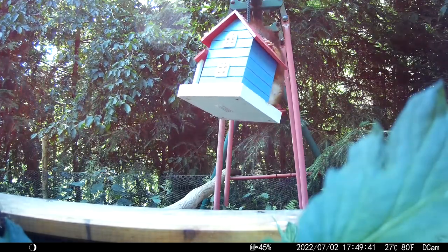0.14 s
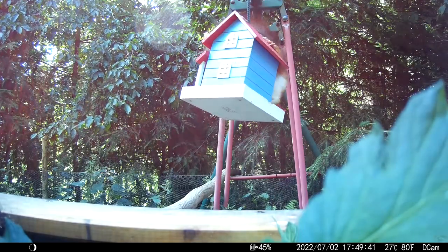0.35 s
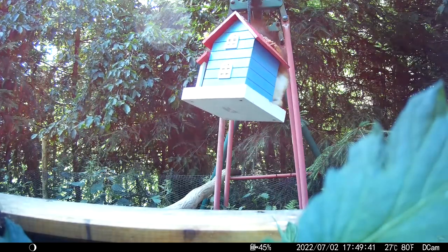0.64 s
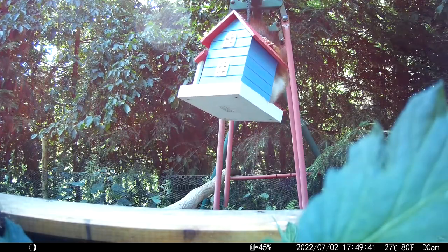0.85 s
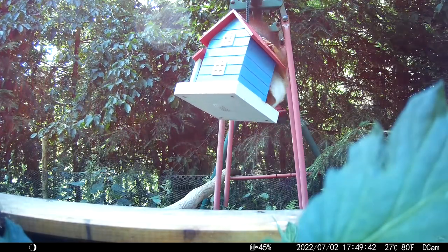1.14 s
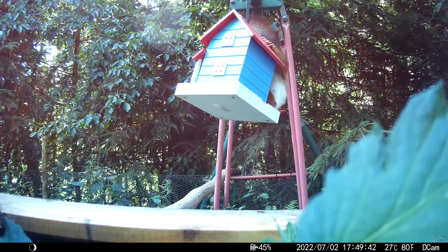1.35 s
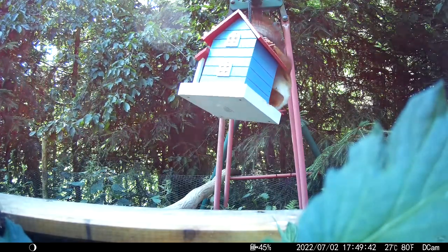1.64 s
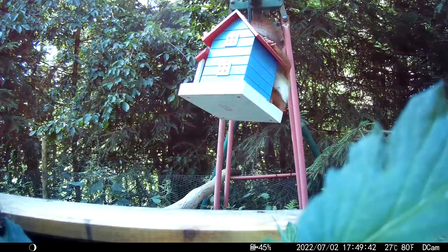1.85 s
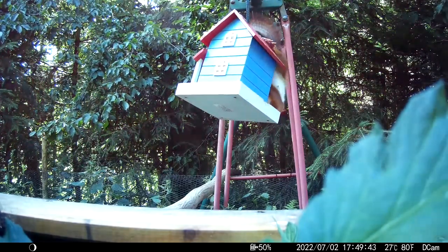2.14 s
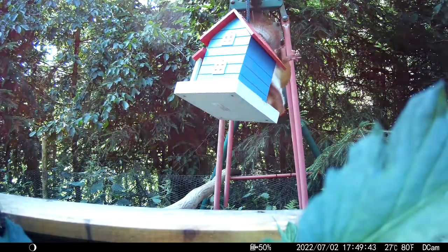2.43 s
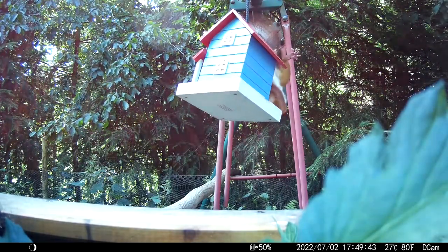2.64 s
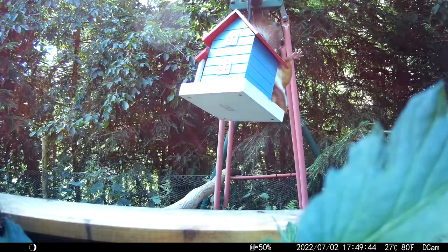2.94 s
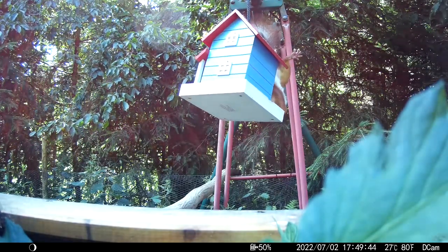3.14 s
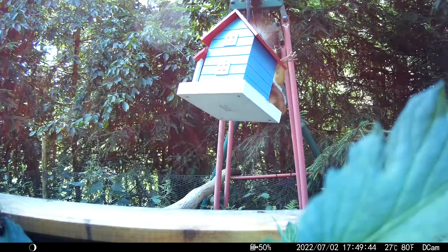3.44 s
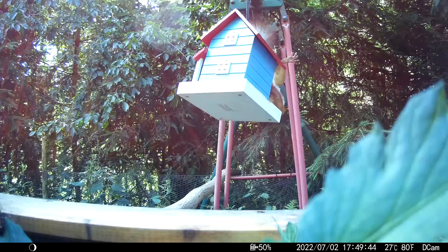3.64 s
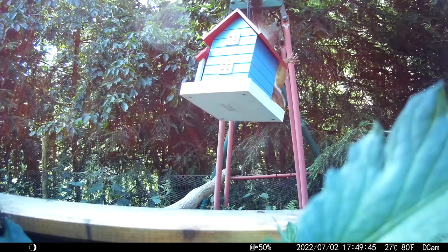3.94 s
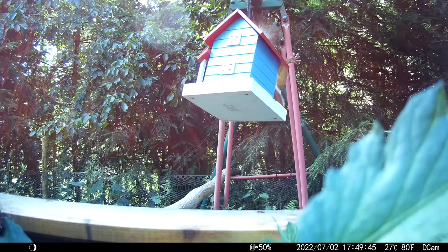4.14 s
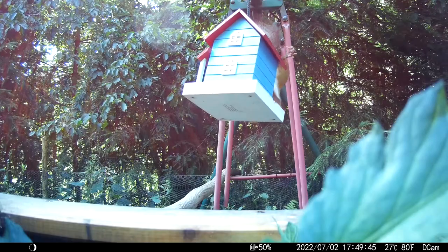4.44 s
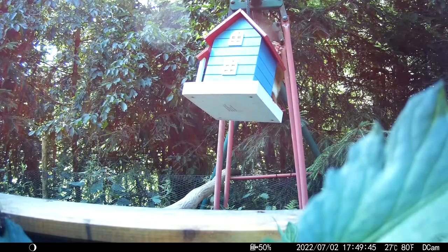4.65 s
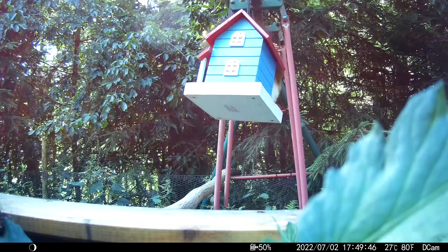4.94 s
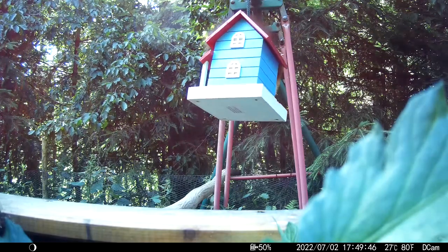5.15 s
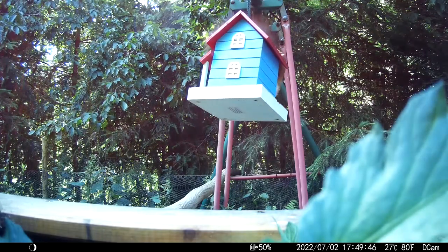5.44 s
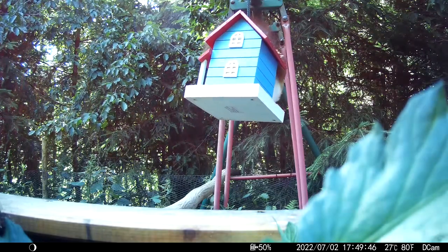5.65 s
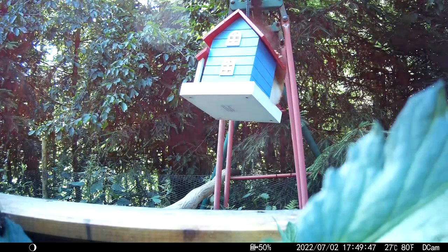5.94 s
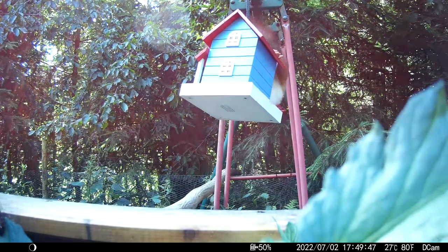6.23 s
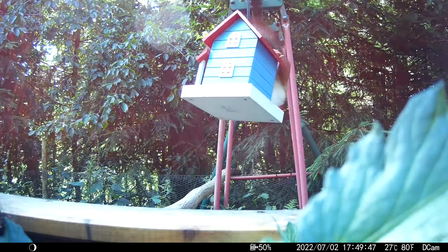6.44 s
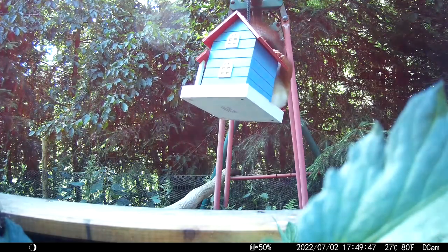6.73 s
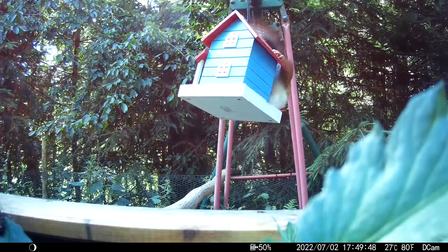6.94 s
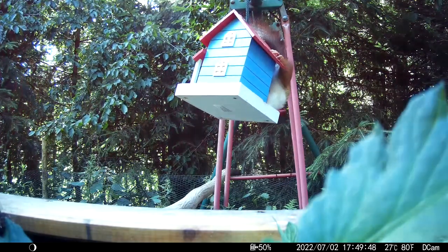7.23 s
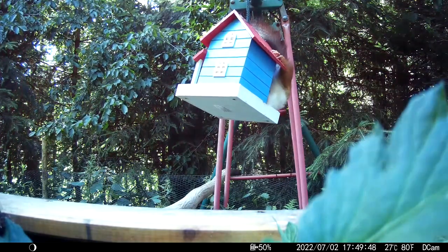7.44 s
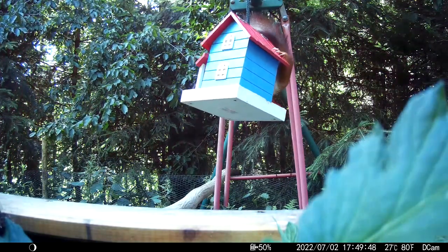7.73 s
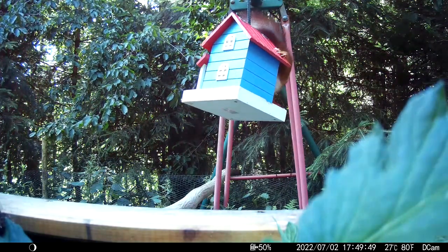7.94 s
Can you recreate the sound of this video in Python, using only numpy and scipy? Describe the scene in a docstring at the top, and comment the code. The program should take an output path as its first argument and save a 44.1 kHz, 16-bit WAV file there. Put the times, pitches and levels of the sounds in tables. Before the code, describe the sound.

Dry claw scrabbling on thin boards, sparse in the middle and hardest near the end, over blackbird whistles, faint hiss and a distant low drone.

```python
"""Garden, 8 s, at a trail camera's microphone close to a small wooden bird feeder with a squirrel on it.
0-2.5 s: claw clicks and gritty strokes, stick-slip noise through board resonances; a blackbird whistles.
2.5-4.8 s: sparser; sharp gliding chirps of a tit, then a soft even run of rubs.
From 4.8 s: scrabbling returns, hardest from 5.5 s, with squeaks, thuds and more gliding whistles.
Throughout: a far engine drones as two wavering sines under the camera's noise hiss and thin sine whine."""
import sys
import numpy as np
from scipy import signal
from scipy.fft import rfft, irfft
from scipy.io import wavfile

SR = 44100
rng = np.random.default_rng(int(sys.argv[2]) if len(sys.argv) > 2 else 0)


def generate_wav(signal):
    """Clip the signal to [-1, 1] and save it as 16-bit WAV at the path in sys.argv[1]."""
    frames = np.transpose(np.atleast_2d(signal))
    scaled = np.clip(frames, -1, 1) * 32767
    pcm = np.round(scaled).astype(np.int16)
    wavfile.write(sys.argv[1], SR, pcm)


N = 356063
TIME = np.arange(N) / SR

# Garden air and camera hiss, spectral shape: (f/Hz, relative level/dB per Hz)
AIR_SPECTRUM = [(12, -37), (20, -7.5), (42, -6), (54, -2), (72, -8.5), (100, -6), (130, -7.5), (200, -8),
                (290, -10.5), (580, -18), (1200, -22.5), (4000, -23.5), (9000, -25), (15600, -34.5)]
AIR_RMS_DB = -59
# Swell of the distant rumble: (t/s, level/dB)
RUMBLE_SWELL = [(0, -1.5), (.6, .5), (1.8, 1.5), (3, -.5), (5, -1.5), (5.7, 1), (6.4, 0), (7.1, 2),
                (8.07, 1.5)]
# Camera whine: (f/Hz, rms level/dB)
WHINE_LINES = [(4687, -77.5), (6250, -77), (9375, -78), (10938, -82.5), (12500, -89), (14062, -88)]
# Far engine, before its trim: (t/s, f/Hz, fundamental level/dB, octave level/dB)
ENGINE_COURSE = [(0, 104, -74, -78), (.45, 97, -61, -70), (1.2, 91, -74, -75), (2.0, 91, -58.5, -64.5),
                 (2.7, 90, -67, -78), (3.6, 91, -61, -68), (4.45, 99, -64.5, -60.5), (4.9, 102, -68, -78),
                 (6.2, 106, -62, -67), (6.7, 108, -64, -71), (7.05, 109, -59, -66), (7.6, 101, -65, -82),
                 (8.07, 100, -69, -64)]
# Bird levels are rms, before the trims in birds() and the waver in loudness.
# Blackbird whistles, one list of points each: (t/s, f/Hz, level/dB)
BLACKBIRD_WHISTLES = [
    [(.27, 2010, -72), (.31, 1970, -71.5), (.37, 1940, -76)],
    [(.41, 2220, -70), (.45, 2270, -65.5), (.47, 2280, -69)],
    [(.72, 1676, -71), (.77, 1703, -71), (.84, 1696, -69)],
    [(1.02, 2660, -69), (1.06, 2570, -64)],
    [(1.27, 2090, -65), (1.32, 2140, -68), (1.38, 2130, -69)],
    [(1.885, 2660, -63), (1.94, 2700, -61), (1.99, 2736, -60)],
    [(6.43, 2220, -73), (6.54, 2230, -66), (6.65, 2180, -69)],
    [(6.67, 2380, -67), (6.72, 2260, -63), (6.76, 2270, -66), (6.83, 2100, -50), (6.88, 2040, -56),
     (6.905, 1890, -63)],
    [(7.13, 1540, -59), (7.18, 1840, -58), (7.24, 2075, -57.5), (7.29, 2098, -55), (7.35, 2090, -61)],
    [(7.395, 1970, -71), (7.435, 1855, -58), (7.48, 1850, -60.5), (7.53, 1882, -59), (7.58, 1850, -56.5),
     (7.615, 1830, -62)],
]
# Fast blackbird trills: (t/s, length/s, first f/Hz, last f/Hz, level/dB)
BLACKBIRD_TRILLS = [(.46, .13, 2280, 2080, -70), (1.07, .08, 2500, 2280, -70), (2.15, .28, 2150, 2260, -72),
                    (6.18, .08, 2450, 2200, -67), (6.26, .11, 1950, 2000, -66)]
# Thin calls of small birds: (t/s, length/s, top f/Hz, level/dB)
SMALL_BIRD_CALLS = [(.76, .34, 6930, -63), (6.19, .14, 7950, -65), (6.40, .14, 7850, -67)]
# Sharp chirps of a tit: (t/s, length/s, top f/Hz, level/dB)
TIT_CHIRPS = [(3.478, .052, 6850, -43.5), (3.738, .05, 6530, -56)]
# Short notes of a far songbird: (t/s, length/s, top f/Hz, level/dB)
FAR_TWITTER = [(.29, .1, 4050, -66), (3.585, .04, 3620, -64), (4.11, .045, 3200, -63),
               (6.645, .09, 3450, -63)]
# Low modes of the hollow feeder box: (f/Hz, relative level/dB, t60/s)
BOX_MODES = [(288, -6, .03), (389, 0, 0.06), (523, -4.5, .02), (670, -1, .018), (910, -2.5, 0.011)]
# Modes of the feeder's thin walls: (f/Hz, relative level/dB, t60/s)
WALL_MODES = [(1103, -6, 0.012), (1350, -3, 0.017), (1596, -3.5, 0.028), (1810, -6, 0.022),
              (1980, -1, 0.027), (2310, -1, 0.022)]
# Ringing of the thin boards, before ring_db and chance: (f/Hz, width/Hz, level over direct sound/dB)
BOARD_RINGING = [(1543, 130, 7.5), (2070, 50, -4), (2700, 20, -11), (3297, 63, -1), (3492, 29, 5.5),
                 (3740, 40, 6), (4566, 180, -4.5), (4900, 78, -5.5), (5680, 51, -5.5), (6300, 130, -7.5),
                 (7020, 140, -2.5)]
# Spectral shape of claw on wood: (f/Hz, relative level/dB per Hz)
CLAW_SPECTRUM = [(400, -31), (1000, -29), (1600, -23), (2300, -14), (3100, -4.5), (4000, -1.5), (4800, 3),
                 (5400, 3), (6500, 1.5), (7700, -0.5), (8400, -11), (9300, -22.5), (12000, -35),
                 (15500, -47)]
# The feeder is bumped: (t/s, time scale/s, thud level/dB, knock level/dB)
FEEDER_BUMPS = [(1.074, .0058, -72, -57), (1.352, .0032, -70, -55), (1.876, .0036, -60, -52.5),
                (2.011, .0031, -59, -51.5), (2.06, .03, -67, -60), (2.456, .005, -59, -58.5),
                (5.114, .006, -53.5, -64), (5.635, .035, -58, -59), (6.064, .0056, -56, -48.5),
                (6.797, .02, -61, -49), (7.084, .035, -61, -61), (7.889, .023, -60, -61)]
# A claw catches and one spot of the wood sings: (t/s, time scale/s, f/Hz, peak level before flutter/dB)
CLAW_SQUEAKS = [(0.156, 0.012, 7270, -43.5), (0.157, 0.014, 4570, -48), (0.16, 0.017, 3560, -46),
                (0.1545, 0.015, 2590, -48), (0.963, 0.011, 2600, -51), (1.433, 0.0099, 3300, -50),
                (5.105, 0.014, 5500, -44.5), (5.099, 0.022, 4050, -54), (5.615, .018, 4670, -29),
                (6.772, 0.0065, 6080, -22.5), (6.789, .020, 3360, -27.5), (6.791, 0.013, 3460, -34),
                (6.788, 0.02, 2770, -32.5), (7.072, .05, 2610, -48.5)]
# Clear claw clicks, before their trim: (t/s, skitter time scale/s, rms level over 4 ms/dB)
CLAW_CLICKS = [(.085, .0011, -55), (.155, .003, -40.5), (.1905, .0005, -43), (.711, .002, -50),
               (.9657, .0032, -43.5), (1.0775, .0024, -39.5), (1.2077, .0008, -45), (1.262, .0005, -47.5),
               (1.3059, .0004, -47), (1.3224, .0005, -49), (1.3713, .0026, -41), (1.4331, .0013, -41.5),
               (1.5514, .0008, -46), (1.6212, .0015, -43), (1.751, .0005, -51), (1.7983, .0009, -44.5),
               (1.8756, .0019, -36), (2.0133, .0023, -38.5), (2.0966, .0017, -39), (2.2907, .0037, -43.5),
               (2.4324, .0024, -46), (2.4578, .0013, -43), (2.5576, .0034, -44), (3.0889, .0018, -46),
               (4.8234, .0009, -48), (5.0724, .0008, -48.5), (5.1138, .0014, -34.5), (5.369, .003, -46),
               (5.393, .0005, -50), (5.4311, .0026, -39.5), (5.6625, .0004, -36), (5.68, .0005, -41.5),
               (5.9633, .0015, -45.5), (6.0282, .0006, -35), (6.0841, .0006, -34), (6.0955, .0011, -34),
               (6.115, .0005, -42.5), (6.1474, .0004, -45), (6.6134, .001, -39.5), (6.8299, .0005, -37),
               (6.8394, .0004, -38), (6.9142, .0012, -38), (6.9406, .0005, -38), (7.0075, .0004, -30.5),
               (7.1197, .001, -34.5), (7.1536, .0007, -36.5), (7.1931, .0007, -43), (7.232, .0003, -43),
               (7.5458, .002, -47), (7.5747, .0013, -33), (7.6974, .001, -37.5), (7.7508, .0007, -33.5),
               (7.7987, .0004, -37.5), (7.8386, .0006, -39.5), (7.8555, .001, -42.5)]
# Single claw strokes, from hard rasps to faint rubs:
# (t of the peak/s, time scale/s, rms level/dB, body colour/dB, edge colour/dB)
SINGLE_STROKES = [(.165, .013, -39, 2, 0), (.196, .024, -54, 6, 1), (1.179, .036, -50, 5, -1),
                  (1.434, .02, -48.5, 1, -6), (1.621, .04, -46.5, 1, 1), (1.835, .034, -49, 5, -1),
                  (1.88, .025, -48, 3, 3), (2.06, .05, -50, 4, 1.5), (2.715, .04, -55, 8, 1.5),
                  (3.45, .04, -62, 7, -3), (3.745, .035, -61, 7, -3), (4.895, .043, -54.5, -4, 1),
                  (5.503, .025, -50, 0, 5), (5.568, .03, -39, 2, -1), (5.589, .003, -25, -2, -3),
                  (5.597, .0037, -19.5, 1, -7), (5.603, .0064, -26, 0, -4), (5.624, .02, -26.5, 1.5, 1),
                  (5.648, .031, -40.5, 11, 8), (6.026, .016, -41.5, 5.5, -6), (6.046, .008, -28.5, 6, 3),
                  (6.062, .026, -29.5, 4, 3.5), (6.088, .031, -49, 10, 3), (6.528, .017, -40.5, 1.5, -7),
                  (6.573, .039, -46, 3, -3), (6.614, .031, -43, 2.5, 1), (6.767, .022, -44, 0, -2),
                  (6.777, .008, -26, -12, -2), (6.8, .026, -24.5, 6.5, -5.5), (6.83, .04, -48, -3, 3),
                  (6.93, .024, -46, 10, -3), (6.963, .016, -26.5, 0, -5), (6.988, .042, -36, 2, -2),
                  (7.052, .017, -38, -1, 4), (7.085, .049, -32, 2.5, 4), (7.12, .02, -41.5, 9.5, -10),
                  (7.294, .027, -52, 1, -2), (7.7, .03, -52, 3, -3), (7.889, .026, -36, 2.5, .5),
                  (7.941, .022, -39, 0, -1), (8.002, .02, -45, 1, 0)]
# Bouts of light scrabbling for a grip: (start t/s, end t/s, rms level of a stroke/dB)
SCRABBLE_BOUTS = [(.36, .43, -60), (.55, .6, -60), (1.2, 1.33, -58.5), (1.45, 1.58, -56), (1.64, 1.7, -53),
                  (1.91, 1.96, -54), (2.0, 2.13, -54), (2.15, 2.47, -57.5), (4.77, 4.85, -58),
                  (5.09, 5.14, -56), (5.26, 5.33, -61), (5.68, 5.97, -59), (6.65, 6.76, -60),
                  (7.13, 7.21, -54), (7.53, 7.65, -56), (7.68, 7.86, -55), (7.9, 8.04, -53)]

# Light strokes within a bout
PAWS_PER_S, PAW_S, PAW_SPREAD_DB = 24, .026, 1.5
PAW_BODY_DB, PAW_EDGE_DB = 3.5, 0.0
# Stray ticks, above the level of their bout
TICKS_PER_S, TICK_S, TICK_OVER_DB, TICK_SPREAD_DB = 20, .0006, 5.5, 1.5
# Colour of a 1 ms click; a longer skitter stirs more of the wood
CLICK_BODY_DB, BODY_DB_PER_OCTAVE, CLICK_EDGE_DB = .7, 1.7, 0.0
CLICK_COLOUR_SPREAD_DB = 1.5
RISE_SHARE = .45   # part of a stroke's time scale in which the claw bites in
PRESSURE_SHAPE = 1.9   # 2 is a round swell, 1 a pointed one
# A quick, even run of soft rubs that swells and fades
RUBS_MIDDLE_S, RUBS_PER_S, RUB_S = 4.055, 13.0, .025
RUB_DB, RUB_FADE_DB = -60, 2.5   # the middle rub; loss per rub away from it
RUB_BODY_DB, RUB_EDGE_DB = 6.0, -3.0
CUTOFF_HZ = 15750


def from_db(db):
    """Amplitude ratio of a level in dB."""
    return 10 ** (np.asarray(db) / 20)


def rms_one(x):
    """Scale a signal to an rms of 1."""
    return x / np.sqrt(np.mean(x ** 2) + 1e-20)


def at_hz(points, hz):
    """Read a spectrum along a logarithmic frequency axis."""
    points = np.array(points, float)
    return np.interp(np.log(np.maximum(hz, 1)), np.log(points[:, 0]), points[:, 1])


def add(out, sound, start_s):
    """Mix a sound in at its time."""
    at = max(round(start_s * SR), 0)
    out[at:at + len(sound)] += sound[:max(N - at, 0)]


def drift(rate, size):
    """Smooth chance with a spread near 1, with so many random knots per second."""
    knots = rng.standard_normal(int(size / SR * rate) + 2)
    return np.interp(np.arange(size) / SR * rate, np.arange(len(knots)), knots)


def with_energy(sound, level_db, samples):
    """Scale a sound to the energy of that rms level held for so many samples."""
    return sound * from_db(level_db) * np.sqrt(samples / (np.sum(sound ** 2) + 1e-20))


def background():
    """Distant rumble under the camera's even hiss and whine: shaped noise and steady sines."""
    hz = np.arange(N // 2 + 1) * SR / N
    shaped = irfft(rfft(rng.standard_normal(N)) * from_db(at_hz(AIR_SPECTRUM, hz)), N)
    air = from_db(AIR_RMS_DB) * rms_one(shaped)
    low = irfft(rfft(air) / (1 + (hz / 1200) ** 2), N)
    swell = from_db(np.interp(TIME, *np.transpose(RUMBLE_SWELL)))
    whine = sum(np.sqrt(2) * from_db(db) * np.sin(2 * np.pi * line_hz * TIME)
                for line_hz, db in WHINE_LINES)
    return air + low * (swell - 1) + whine


def engine(trim_db=-2.5):
    """A far drone, fundamental and octave, whose speed sags and picks up; the air makes it waver."""
    s, hz, *levels = np.transpose(ENGINE_COURSE)
    pitch = np.interp(TIME, s, hz) * (1 + 0.0083 * drift(18, N))
    phase = 2 * np.pi * np.cumsum(pitch) / SR
    out = np.zeros(N)
    for harmonic, db in enumerate(levels, start=1):
        loudness = from_db(np.interp(TIME, s, db) + trim_db + 1.86 * drift(14, N))
        out += np.sqrt(2) * loudness * np.sin(harmonic * phase)
    return out


def trees(sound, wet_db, t60):
    """Trunks and leaves scatter a soft tail back: decaying noise with a gentle onset."""
    t = np.arange(SR) / SR
    tail = rng.standard_normal(SR) * 1000 ** (-t / t60) * (1 - np.exp(-t / 0.0065))
    return sound + signal.fftconvolve(sound, with_energy(tail, wet_db, 1))[:N]


def whistles(notes, waver, flutter_db, fade_s=0.0048, trill=0.0, trill_hz=32):
    """Nearly pure gliding tones with a slight waver; a trill swings the pitch up and down."""
    out = np.zeros(N)
    for note in notes:
        s, hz, level_db = np.transpose(note)
        t = np.arange(s[0], s[-1], 1 / SR)
        swing = trill * np.sin(2 * np.pi * trill_hz * (t - t[0]))
        pitch = np.interp(t, s, hz) * (1 + waver * drift(250.6, len(t)) + swing)
        gate = np.clip(np.minimum(t - t[0], t[-1] - t) / fade_s, 0, 1)
        loudness = gate * from_db(np.interp(t, s, level_db) + flutter_db * drift(61.6, len(t)))
        add(out, np.sqrt(2) * loudness * np.sin(2 * np.pi * np.cumsum(pitch) / SR), s[0])
    return out


def arches(calls, rise, fall, ends_db, top_share):
    """Each call swings up to its top pitch and level, then sinks; rise and fall are shares of that pitch."""
    return [[(s, hz * (1 - rise), db + ends_db),
             (s + top_share * length_s, hz, db),
             (s + length_s, hz * (1 - fall), db + ends_db)] for s, length_s, hz, db in calls]


def slides(calls, fade_db):
    """Each call slides evenly between two pitches and fades on the way."""
    return [[(s, first_hz, db + fade_db / 2),
             (s + length_s, last_hz, db - fade_db / 2)] for s, length_s, first_hz, last_hz, db in calls]


def birds():
    """A blackbird and smaller birds, gliding tones at different depths in the trees."""
    trills = slides(BLACKBIRD_TRILLS, fade_db=4.0)
    calls = arches(SMALL_BIRD_CALLS, rise=.005, fall=.003, ends_db=-2.0, top_share=.5)
    chirps = arches(TIT_CHIRPS, rise=.17, fall=.015, ends_db=-12.0, top_share=.38)
    notes = arches(FAR_TWITTER, rise=.04, fall=.06, ends_db=-3.0, top_share=.3)

    whistled = trees(whistles(BLACKBIRD_WHISTLES, waver=0.0037, flutter_db=1.5), wet_db=-7.5, t60=.85)
    trilled = trees(whistles(trills, waver=.03, flutter_db=3.0, trill=0.07), wet_db=-2.0, t60=.5)
    thin = trees(whistles(calls, waver=.011, flutter_db=2.0), wet_db=-5.0, t60=0.3)
    chirped = trees(whistles(chirps, waver=0.02, flutter_db=2.5), wet_db=-7.5, t60=0.25)
    twitter = trees(whistles(notes, waver=.04, flutter_db=3.0), wet_db=1.0, t60=0.3)
    small = from_db(-4.0) * thin + from_db(-2.0) * chirped + from_db(-5.0) * twitter
    return whistled + from_db(-2.0) * trilled + small


def bumps():
    """Paws and body push on the feeder: noise bursts make the box thud and its walls knock."""
    out, t = np.zeros(N), np.arange(SR // 6) / SR
    for s, length_s, thud_db, knock_db in FEEDER_BUMPS:
        force = rng.standard_normal(len(t)) * np.exp(-(t / length_s) ** 2)
        for modes, level_db in ((BOX_MODES, thud_db), (WALL_MODES, knock_db)):
            ring = np.zeros(len(t))
            for k, (hz, db, t60) in enumerate(modes):
                sign = (-1) ** k   # neighbouring modes move in opposite directions
                ring += sign * from_db(db) * np.sin(2 * np.pi * hz * t) * 1000 ** (-t / t60)
            sound = signal.fftconvolve(force, ring)
            add(out, with_energy(sound, level_db, (length_s + 0.0026) * SR), s)
    return out


def squeaks(waver=0.015):
    """The slips lock onto one resonance for a moment, unevenly: short wavering sines."""
    out = np.zeros(N)
    for s, length_s, hz, level_db in CLAW_SQUEAKS:
        t = np.arange(0, 1.7 * length_s, 1 / SR)
        grip = np.interp(t / length_s, [0, .06, .85, 1.5], [0, 1, 1, 0]) ** 2
        phase = 2 * np.pi * hz * np.cumsum(1 + waver * drift(760, len(t))) / SR
        loudness = from_db(level_db + 3.5 * drift(590, len(t)))
        add(out, loudness * grip * np.sin(phase), s)
    return out


def causal(gain_db):
    """Minimum-phase response for a gain curve: nothing sounds before its cause."""
    cepstrum = irfft(np.log(from_db(gain_db)))
    half = len(cepstrum) // 2
    cepstrum[1:half] *= 2
    cepstrum[half + 1:] = 0
    return np.exp(rfft(cepstrum))


def through_boards(force, body_db, edge_db, ring_db, grit_db, patchy_db, patch_hz, size=4096):
    """Claw force heard through the wood; each spot it touches favours other resonances."""
    hz = np.arange(size // 2 + 1) * SR / size
    colour = [(700, .5 * edge_db), (1800, body_db), (3200, body_db), (4200, 0), (5200, 0),
              (6300, edge_db), (8500, edge_db), (10500, 2 * edge_db + grit_db)]
    patches = np.interp(hz / patch_hz, np.arange(len(hz)), rng.standard_normal(len(hz)))
    spot = at_hz(colour, hz) + patchy_db * patches
    wood = 1   # the direct sound
    for mode_hz, width_hz, mode_db in BOARD_RINGING:
        strength = from_db(mode_db + ring_db + rng.normal(0, 1.8))
        wood = wood + strength / (1 + 2j * (hz - mode_hz) / width_hz)
    response = irfft(causal(at_hz(CLAW_SPECTRUM, hz) + spot) * wood)
    return signal.fftconvolve(force, response)


def clicks(snaps, trim_db=-.5, chatter=0.2, rebound_db=-8.0):
    """A claw tip snaps off the grain, skitters for a moment and lands once more."""
    out, t = np.zeros(N), np.arange(SR // 40) / SR
    level_window_s, usual_s = .004, .001
    for s, length_s, level_db in snaps:
        force = chatter * rng.standard_normal(len(t)) * np.exp(-.3 * (t / length_s) ** 2)
        force[0] += 1
        landing = int(rng.uniform(.001, .005) * SR)
        force[landing] += from_db(rebound_db + rng.normal(0, 3))
        body_db = CLICK_BODY_DB + BODY_DB_PER_OCTAVE * np.log2(length_s / usual_s)
        body_db += CLICK_COLOUR_SPREAD_DB * rng.standard_normal()
        edge_db = CLICK_EDGE_DB + CLICK_COLOUR_SPREAD_DB * rng.standard_normal()
        sound = through_boards(force, body_db, edge_db, ring_db=-4.0, grit_db=-16.0,
                               patchy_db=2.4, patch_hz=611)
        add(out, with_energy(sound, level_db + trim_db, level_window_s * SR), s)
    return out


def slips(size, per_s, spread_db):
    """Stick and slip: tiny releases at random moments, a few much larger than the rest."""
    heights = from_db(spread_db * np.minimum(rng.exponential(1, size), 4))
    signs = rng.choice([-1, 1], size)
    return heights * signs * (rng.random(size) < per_s / SR)


def scratches(strokes, judder_db, slips_per_s, spread_db, rub):
    """A claw bites, drags and lets go; light strokes crackle, hard ones rasp."""
    out = np.zeros(N)
    for peak_s, length_s, level_db, body_db, edge_db in strokes:
        rise_s, fall_s = RISE_SHARE * length_s, (1 - RISE_SHARE) * length_s
        t = np.arange(-1.8 * rise_s, 2.1 * fall_s, 1 / SR)
        pressure = np.exp(-.5 * np.abs(t / np.where(t < 0, rise_s, fall_s)) ** PRESSURE_SHAPE)
        per_s = slips_per_s * from_db(.8 * (level_db + 42.5))   # slips_per_s holds at -42.5 dB
        ridges = from_db(judder_db * drift(258.5, len(t)))   # the claw crosses the grain of the wood
        friction = slips(len(t), per_s, spread_db) + rub * rng.standard_normal(len(t))
        force = pressure * ridges * friction
        sound = through_boards(force, body_db, edge_db, ring_db=-5.5, grit_db=4.0,
                               patchy_db=2.5, patch_hz=110)
        add(out, with_energy(sound, level_db, np.sum(pressure ** 2)), peak_s + t[0])
    return out


def rubs(count=7):
    """Evenly spaced soft strokes, strongest in the middle of the run."""
    return [(RUBS_MIDDLE_S + k / RUBS_PER_S, RUB_S, RUB_DB - RUB_FADE_DB * abs(k), RUB_BODY_DB, RUB_EDGE_DB)
            for k in np.arange(count) - count // 2]


def scrabbling():
    """Light strokes and stray ticks of paws that hunt for a grip, as two lists of events."""
    strokes, ticks = [], []
    for start_s, end_s, level_db in SCRABBLE_BOUTS:
        bout_s = end_s - start_s
        count = max(round(PAWS_PER_S * bout_s), 1)
        for k in range(count):
            late, longer, louder = rng.standard_normal(3)
            s = start_s + bout_s * (k + .5 + .15 * late) / count
            length_s = PAW_S * np.exp(.2 * longer)
            stroke_db = level_db + PAW_SPREAD_DB * louder
            strokes.append((s, length_s, stroke_db, PAW_BODY_DB, PAW_EDGE_DB))
        for s in rng.uniform(start_s, end_s, round(TICKS_PER_S * bout_s)):
            tick_db = level_db + TICK_OVER_DB + TICK_SPREAD_DB * rng.standard_normal()
            ticks.append((s, TICK_S, tick_db))
    return strokes, ticks


def squirrel():
    """Single strokes and clicks among the light scrabbling; the feeder squeaks and thuds."""
    light_strokes, ticks = scrabbling()
    single = scratches(SINGLE_STROKES, judder_db=2.2, slips_per_s=2000, spread_db=3.0, rub=.05)
    light = scratches(light_strokes, judder_db=2.5, slips_per_s=1500, spread_db=3.2, rub=.04)
    soft = scratches(rubs(), judder_db=1.5, slips_per_s=2000, spread_db=2.0, rub=.2)
    close = single + light + soft + clicks(CLAW_CLICKS + ticks) + squeaks() + bumps()
    return trees(close, wet_db=-19.5, t60=0.24)


def scene():
    """The garden from the far background to the squirrel close by, as one channel."""
    return (background() + engine() + birds() + squirrel())[None]


def record(dry):
    """The camera cuts off the top with a steep low-pass."""
    lowpass = signal.ellip(10, .2, 70, CUTOFF_HZ, fs=SR, output="sos")
    return signal.sosfilt(lowpass, dry)


dry = scene()
out = record(dry)
generate_wav(out)
```